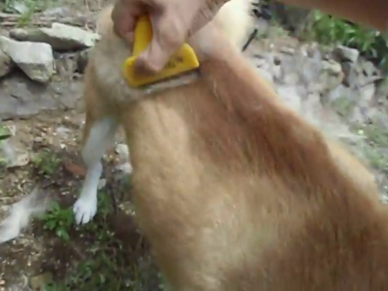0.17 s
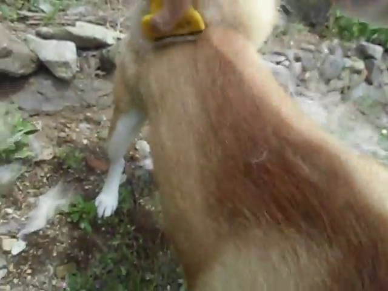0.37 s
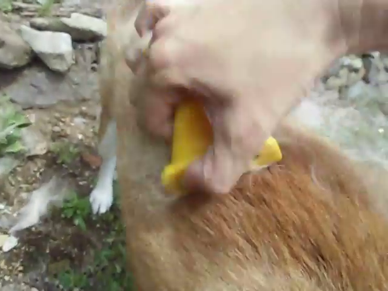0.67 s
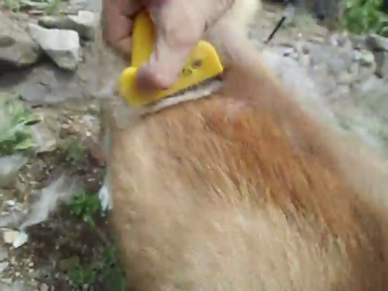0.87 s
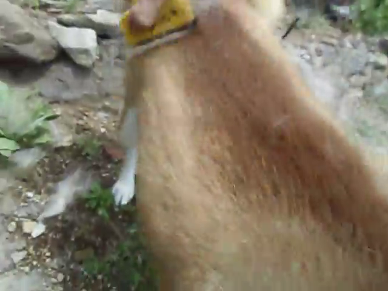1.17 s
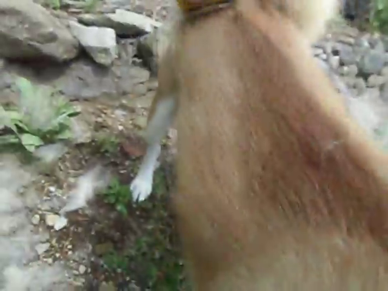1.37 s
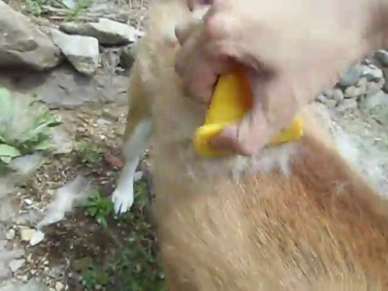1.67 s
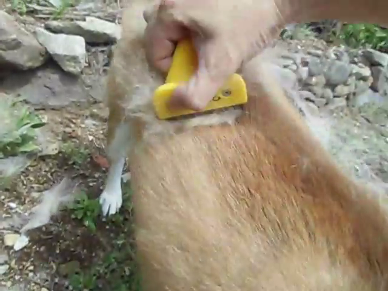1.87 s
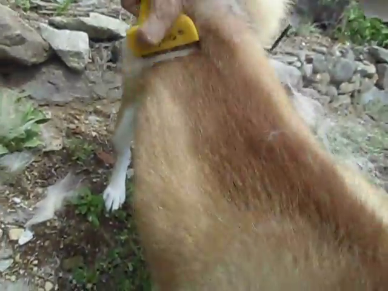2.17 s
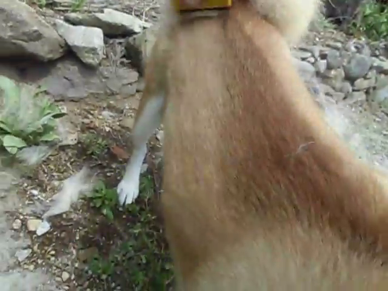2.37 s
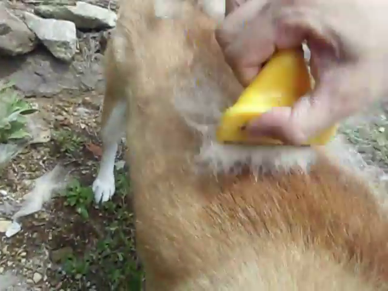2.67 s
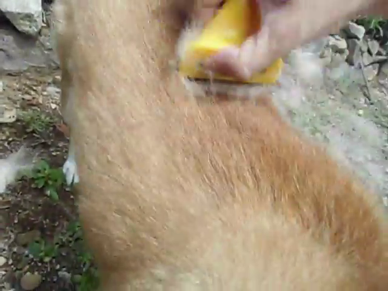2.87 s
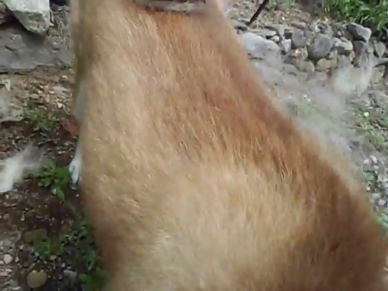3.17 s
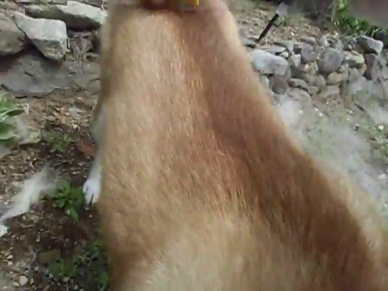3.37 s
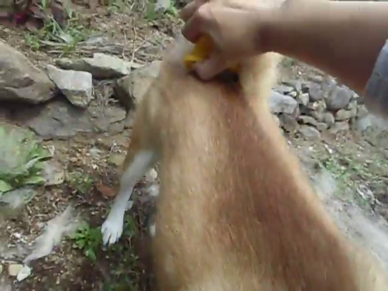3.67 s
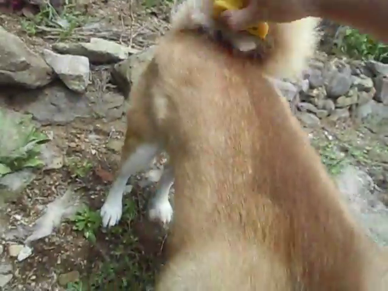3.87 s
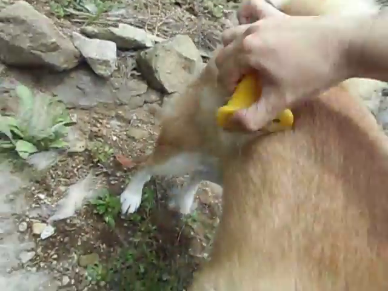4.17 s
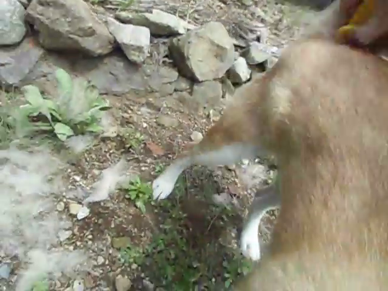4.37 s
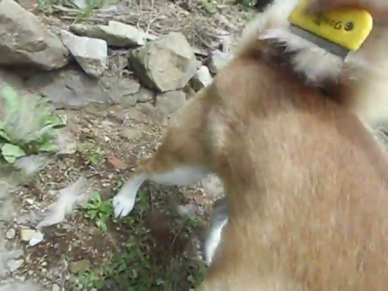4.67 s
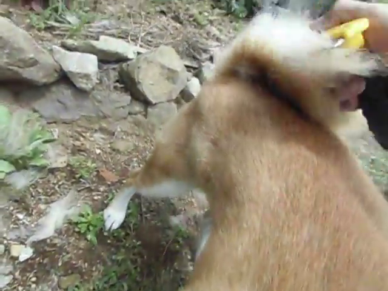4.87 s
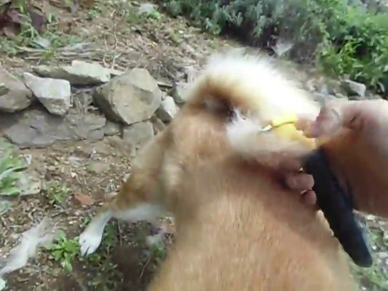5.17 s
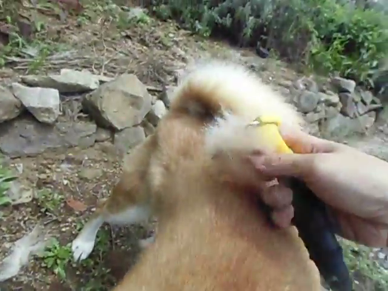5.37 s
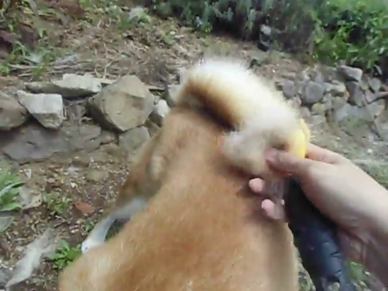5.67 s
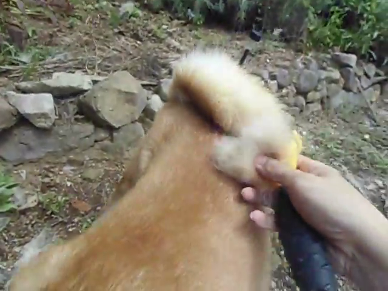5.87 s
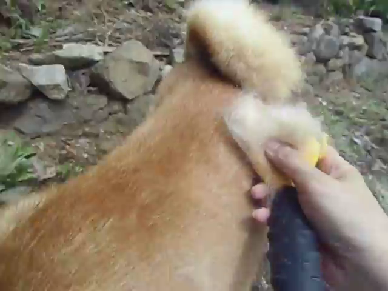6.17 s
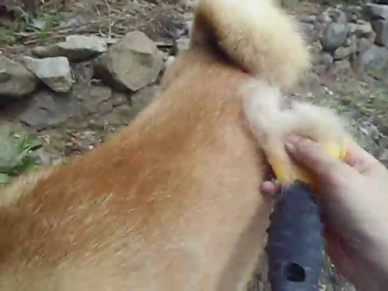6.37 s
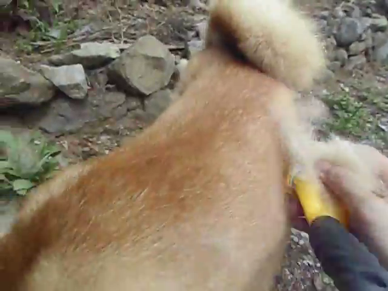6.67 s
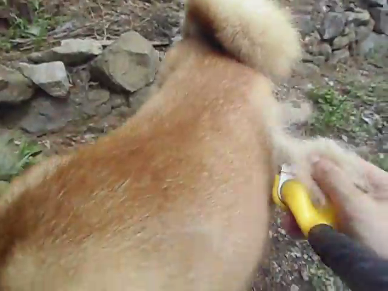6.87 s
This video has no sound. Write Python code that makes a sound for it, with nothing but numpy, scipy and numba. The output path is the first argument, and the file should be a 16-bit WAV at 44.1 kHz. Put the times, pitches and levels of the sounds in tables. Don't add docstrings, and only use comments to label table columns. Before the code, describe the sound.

Bright, rapidly throbbing cicada song outdoors, with low wind buffets, tiny motor ticks and soft scratchy snaps of a grooming brush in a coat.

```python
import sys
import numpy as np
from scipy import signal
from scipy.fft import rfft, irfft, next_fast_len
from scipy.io import wavfile
from scipy.ndimage import uniform_filter1d
from numba import njit

SR = 44100
rng = np.random.default_rng(int(sys.argv[2]) if len(sys.argv) > 2 else 0)


def output_pcm(signal):
    pcm = np.clip(np.atleast_2d(signal).T, -1, 1) * 32767
    wavfile.write(sys.argv[1], SR, np.round(pcm).astype(np.int16))


def gain_from_db(level_db):
    decades = np.asarray(level_db, float) / 20
    return 10 ** decades


N = 309582
TIME = np.arange(N) / SR

# time in seconds, strokes done (whole numbers = ring at its highest).
ABDOMEN_STROKES = [
    (0.0, 0.08),
    (0.75, 11.24),
    (1.5, 22.48),
    (3.5, 52.44),
    (5.25, 78.72),
    (6.25, 93.86),
    (7.03, 105.61),
]
# time in seconds, level in dB, low stroke over its usual share in dB,
# deep ring over the low drum in dB.
SONG = [(0.0, -44.5, -3, 6.5), (0.7, -42.5, -0.5, 4), (1.05, -42, -1, 4), (1.75, -43, -2.5, 2.5),
        (2.1, -42, -1, 4.5), (2.45, -46, 0.5, 3.5), (2.8, -44, -2, -1), (3.15, -44.5, -5, 6.5),
        (3.85, -43.5, -2, 0), (4.2, -41, -5, 0), (4.55, -42, -4.5, -7), (4.9, -41.5, -2.5, 1.5),
        (5.4, -40, -1.5, 5.5), (6.3, -47, -2.5, 2), (6.65, -43.5, 0, 1.5), (7.02, -45.5, -2, 4)]
# time in seconds, click pairs a second.
CLICK_PAIRS = [
    (0, 175.5),
    (2.7, 175.9),
    (4.5, 176.4),
    (7.02, 177.1),
]
# time in seconds, lag in ms, level in dB.
HAND_BOUNCE = [
    (0, 1.87, -15),
    (3, 1.29, -8),
    (5.3, 1.96, -13.5),
    (5.95, 1.73, -1),
    (6.3, 1.5, -1),
    (6.6, 1.4, -5),
    (7.02, 1.4, -5),
]
# centre in Hz, width in Hz, level in dB.
DEEP_RING = [(4680, 170, 1), (4540, 90, 0), (4840, 90, -3), (4175, 60, -10)]
# centre in Hz, width in Hz, level in dB.
HIGH_DRUM = [(7930, 650, 0), (7350, 500, -4)]
# centre in Hz, width in Hz, level in dB.
LOW_OVERTONE = [(10600, 400, 0), (11050, 550, -1)]
# centre in Hz, width in Hz, level in dB.
SHELL = [(9537, 140, 12.5), (9880, 130, 14.5), (9240, 2200, -12), (6100, 400, -30), (13900, 12000, -13)]
LOW_DRUM_DB, HIGH_DRUM_DB, LOW_OVERTONE_DB, STONES_LAG_MS = -10, -17.5, -13, 0.409
FALL_LEAD = .04

# frequency in Hz, level in dB per Hz.
GARDEN_COLOUR = [(40, -7.5), (150, -4.5), (400, -5.5), (820, -12.5), (1600, -19), (3300, -22.5),
                 (4380, -20), (4600, -12.5), (5700, -12), (6800, -18.5), (8700, -22), (10500, -13),
                 (12200, -13.5), (14300, -13.5), (16000, -19.5)]
GARDEN_DB = -46.5

# peak time in seconds, length in seconds, buffet in dB,
# flutter over buffet in dB.
GUSTS = [(0.036, 0.18, -37.5, -8), (1.827, 0.073, -38.5, -16), (1.933, 0.084, -35, -7),
         (2.079, 0.087, -36.5, -12), (2.205, 0.15, -41, -4), (2.415, 0.14, -45.5, 3),
         (2.636, 0.18, -40.5, 0.5), (2.724, .1, -36.5, -7), (2.855, 0.049, -34, -15),
         (3.275, 0.22, -44.5, -3), (3.673, 0.15, -47.5, -1), (3.93, 0.085, -41, -4), (4.064, 0.09, -34, -9),
         (4.16, .1, -33.5, -32), (4.308, 0.16, -32, -4), (4.443, 0.11, -26, -20),
         (4.585, 0.065, -33.5, -41), (4.683, 0.087, -33, -38), (4.797, 0.053, -37.5, 0),
         (4.9, 0.23, -41, -12), (5.183, 0.11, -33, -15), (5.307, 0.08, -34, 7), (5.396, 0.15, -29.5, -1),
         (5.566, 0.34, -42, -13), (5.933, .15, -45.5, -1), (6.126, .08, -35.5, -5),
         (6.32, 0.08, -35.5, -28), (6.455, 0.1, -27.5, -9), (6.665, 0.08, -42.5, -19),
         (6.85, 0.15, -44.5, -24)]
BREEZE_DB, FLUTTER_DB = -47, -42.5

# start in seconds, length in seconds, level in dB, brightest point in Hz, width in Hz.
STROKES = [(0.062, 0.13, -51.5, 4050, 2000), (0.242, 0.21, -64, 3500, 2000),
           (1.028, 0.15, -59.5, 3650, 2000), (1.862, 0.11, -69, 3220, 2000),
           (2.077, 0.092, -62, 3520, 2000), (2.924, 0.069, -54, 4230, 1100),
           (3.273, 0.059, -61, 3600, 1500), (3.773, .05, -60, 3500, 1500), (4.158, 0.067, -67, 3500, 2000),
           (4.302, .09, -59, 3800, 2000), (5.18, 0.65, -63, 3530, 1960), (5.85, 0.19, -69, 3500, 1980)]
# time in seconds, peak level in dB.
SNAPS = [(0.0413, -63), (0.0882, -47), (0.1284, -52), (0.2758, -51), (0.9797, -53), (1.0115, -44),
         (1.035, -42), (1.1318, -49), (2.9776, -51), (3.1082, -53), (3.3, -52), (3.6744, -57),
         (3.7954, -57), (3.8087, -51), (4.4643, -56)]

# first step in seconds, number of steps,
# level in dB, change a step in dB.
HUNTS = [(0.047, 1, -53, 0), (0.115, 3, -58, -1), (0.248, 5, -60.5, .5), (0.449, 5, -56.5, -0.5),
         (0.949, 5, -60, 1.15), (1.114, 5, -63.5, 0.5), (1.282, 2, -59.5, 3), (1.482, 1, -62, 0),
         (1.549, 5, -59.5, .7), (2.049, 3, -62.5, 2.5), (2.283, 4, -62.5, 1.9), (2.784, 1, -60, 0),
         (2.851, 2, -58.5, 1.5), (3.051, 5, -59.5, .8), (3.251, 5, -58.5, -0.4), (4.052, 5, -60, 0.7),
         (4.251, 5, -56, -0.6), (4.821, 5, -57, .1), (5.018, 5, -60.5, 1.55), (5.22, 4, -56, -0.6),
         (5.52, 5, -55.5, -0.7), (5.72, 4, -61.5, .1), (5.855, 5, -57.5, 0.1), (6.054, 5, -57.5, 0),
         (6.289, 4, -60, 0.4), (6.687, 3, -60, 1), (6.988, 1, -64, 0)]
# centre in Hz, width in Hz, level in dB.
CAMERA_BODY = [(1388, 550, -0.5), (1849, 190, 6), (1994, 177, 5.5), (2638, 270, 4)]
FRAME_S = 1 / 29.97
STEP_SCATTER_DB = .8

# time in seconds, pitch in Hz, level in dB.
CHIRP = [
    (6.468, 3800, -80),
    (6.476, 3850, -58),
    (6.5, 3870, -54),
    (6.508, 3800, -76),
    (6.518, 3600, -61),
    (6.535, 3380, -59),
    (6.543, 3300, -82),
]


def unit(x):
    return x / np.sqrt(np.mean(x ** 2))


def curves(table):
    s, *columns = np.transpose(table)
    return [np.interp(TIME, s, c) for c in columns]


@njit
def svf(x, hz, width):
    y, b, l = np.empty(len(x)), 0., 0.
    for i in range(len(x)):
        g = np.tan(np.pi * hz[i] / SR)
        k = np.pi * width[i] / SR * (1 + g * g) / g
        v = (b + g * (x[i] - l)) / (1 + g * (g + k))
        b, l, y[i] = 2 * v - b, l + 2 * g * v, k * v
    return y


def svf_twice(x, hz, width):
    return svf(svf(x, hz, width), hz, width)


def ring(x, hz, width_hz):
    b, a = signal.iirpeak(hz, hz / width_hz, SR)
    return signal.lfilter(b, a, signal.lfilter(b, a, x))


def body(x, modes):
    return unit(sum(gain_from_db(db) * ring(x, hz, width) for hz, width, db in modes))


def impulses(s, size):
    margin = 16
    out = np.zeros(N + 64)
    at = np.clip(s * SR, 0, N) + margin
    near = np.floor(at)[:, None] + np.arange(-7, 9)
    off = near - at[:, None]
    pulse = np.sinc(off) * np.cos(np.pi * off / 16) ** 2
    np.add.at(out, near.astype(int), size[:, None] * pulse)
    return out[margin:N + margin]


def walk(rate):
    k = int(SR / rate)
    held = rng.standard_normal(N // 100)[np.arange(N) // k]
    return unit(uniform_filter1d(uniform_filter1d(held, k), k))


def cicada():
    done = curves(ABDOMEN_STROKES)[0]
    turn = 2 * np.pi * (done + FALL_LEAD * (1 - np.cos(2 * np.pi * done)))
    stroke = np.cos(turn)
    up = .5 + .5 * np.tanh(.9 * stroke) / np.tanh(.9)
    down = (1 - up) ** 1.04

    over_high_db, share_db, deep_db = curves(SONG)
    low_db = over_high_db + share_db + LOW_DRUM_DB
    high_db = over_high_db + HIGH_DRUM_DB
    over_low_db = over_high_db + share_db + LOW_OVERTONE_DB

    pairs = np.cumsum(curves(CLICK_PAIRS)[0] * (1 - 0.001666 * stroke + .0008 * walk(12))) / SR
    k = np.arange(int(2 * pairs[-1]))
    chance = rng.standard_normal((N // 100, 2))[:len(k)].T
    right = k % 2
    s = np.interp(k / 2, pairs, TIME) + 9e-6 * chance[0]
    lame = right * (0.013 + np.interp(s, TIME, up) ** 2)
    size = gain_from_db(-4.5 * lame + 1.2 * chance[1] + .6 * np.interp(s, TIME, walk(14)))
    s = s + 30e-6 * lame

    hand_ms, hand_db = (np.interp(s, TIME, c) for c in curves(HAND_BOUNCE))
    stones_s = STONES_LAG_MS / 1000 * (1 + .04 * np.interp(s, TIME, walk(1.5)))
    s = np.r_[s, s + stones_s, s + hand_ms / 1000]
    size = np.r_[size, gain_from_db(-14) * size, gain_from_db(hand_db) * size]
    clicks = impulses(s, size)
    uneven = impulses(s, size * gain_from_db(-7 * np.tile(right, 3)))

    analytic = signal.hilbert(uneven, next_fast_len(N))[:N]
    swung = np.real(analytic * np.exp(2j * np.pi * .5 * pairs))
    drum_hz, drum_width_hz = 5330 - 200 * np.sin(turn), 700 + 0 * up
    low = gain_from_db(3) * (0.06 + down) * unit(svf_twice(swung, drum_hz, drum_width_hz))
    low = low + gain_from_db(-2) * down ** 1.5 * body(swung, [(5370, 200, 0), (5190, 150, 0)])
    deep = gain_from_db(deep_db) * (down * body(swung, DEEP_RING) + 0.5 * up * body(clicks, DEEP_RING[:2]))
    high = gain_from_db(high_db + 4.5) * up ** 4 * body(clicks, HIGH_DRUM)

    hz, width_hz = 10800 + 4550 * up ** 1.5, 850 + 2100 * up
    overtone = svf_twice(clicks, hz, width_hz) / np.sqrt(width_hz)
    over_db = over_low_db - 1.5 + (over_high_db + 6 - over_low_db) * up ** 0.8
    arch = unit(svf(svf(clicks, 0.519 * hz, 0.15 * width_hz), 0.518 * hz, 0.15 * width_hz))
    high = high + gain_from_db(high_db + 1.5) * up ** 0.73 * arch

    near = gain_from_db(low_db - 0.5) * (low + deep) + high + gain_from_db(-59.5) * body(clicks, SHELL)
    near += gain_from_db(over_db) * unit(overtone)
    near += gain_from_db(over_low_db + 5.0) * down ** 0.52 * body(clicks, LOW_OVERTONE)
    haze = rng.standard_normal(9000) * np.exp(-np.arange(9000) / SR / 0.007)
    haze = haze / np.sqrt(np.sum(haze ** 2))
    return near + gain_from_db(-12) * signal.fftconvolve(near, haze)[:N]


def garden():
    hz = np.maximum(np.arange(N // 2 + 1) * SR / N, 1)
    colour_hz, colour_db = np.transpose(GARDEN_COLOUR)
    colour = np.interp(np.log(hz), np.log(colour_hz), colour_db)
    hiss = unit(irfft(rfft(rng.standard_normal(N)) * gain_from_db(colour), N))
    cricket = unit(ring(rng.standard_normal(N), 2469, 66))
    return gain_from_db(GARDEN_DB + .5 * walk(1.71)) * hiss + gain_from_db(-74 + 0.76 * walk(2.9)) * cricket


def gusts():
    s, length, db, over_db = np.transpose(GUSTS)
    slow = TIME[::64]
    bells = np.exp(-(2.0 * (slow - s[:, None]) / length[:, None]) ** 2)
    push, shiver = (np.interp(TIME, slow, gain_from_db(d) @ bells) for d in (db, db + over_db))
    breeze = gain_from_db(BREEZE_DB + 0.5 * walk(12))
    return breeze + push, shiver + gain_from_db(FLUTTER_DB + 1.7 * walk(4.5)) / (1 + 1.8 * push / breeze)


def wind():
    push, shiver = gusts()
    chance = rng.random((1500, 2)).T
    kick_size = gain_from_db(-2.2 * np.log(1 - chance[1])) * (-1.) ** np.arange(1500)
    kicks = impulses(chance[0] * N / SR, kick_size)
    eddies = unit(kicks) + 0.64 * rng.standard_normal(N)
    buffet = push * body(eddies, [(34.7, 42.6, 7.5), (56, 47.5, -1.5)])
    flutter = shiver * gain_from_db(-7.0) * body(eddies, [(105.0, 103, 3.5), (174, 55, -11)])
    soft = signal.butter(4, 330, fs=SR, output="sos")
    return signal.sosfilt(soft, buffet + flutter)


def brush():
    chance = rng.random((3500, 2)).T
    tick_size = gain_from_db(-2.1 * np.log(1 - chance[1])) * (-1.) ** np.arange(3500)
    ticks = unit(impulses(chance[0] * N / SR, tick_size))
    hairs = (ticks + 0.4 * rng.standard_normal(N)) * gain_from_db(4.4 * walk(45))
    out = np.zeros(N)
    for start, length, db, hz, width in STROKES:
        at = slice(int(start * SR), int((start + length) * SR))
        rasp = body(hairs[at], [(hz, width, 0), (1500, 1500, -6), (6500, 3500, -7)])
        out[at] += gain_from_db(db) * np.hanning(len(rasp)) ** 0.14 * rasp
    s, db = np.transpose(SNAPS)
    snaps = impulses(s, gain_from_db(db + 26))
    return out + ring(snaps, 3850, 1800) + 0.75 * ring(snaps, 5200, 5000)


def motor_steps():
    rows = []
    for s, count, db, change in HUNTS:
        for k in range(int(round(count))):
            rows.append((s + k * FRAME_S, db + k * change))
    s, db = np.transpose(rows)
    return s, db + STEP_SCATTER_DB * rng.standard_normal(200)[:len(s)]


def focus_motor():
    s, db = motor_steps()
    after = np.arange(1800) / SR
    rattle = np.exp(-(after / 0.02) ** 1.7) * np.minimum(after / 0.0015, 1)
    shake = signal.fftconvolve(impulses(s, gain_from_db(db)), rattle)[:N] * rng.standard_normal(N)
    chance = rng.standard_normal((200, 6))[:len(s)]
    knock = np.arange(3)
    when = s[:, None] + 0.001993 + 0.0062 * knock + 0.000828 * chance[:, :3]
    knock_db = db[:, None] + 22.5 - 5.9 * knock + 1.2 * chance[:, 3:]
    knocks = impulses(when.ravel(), gain_from_db(knock_db).ravel())
    drive = shake + knocks
    through_body = gain_from_db(4.0) * body(drive, CAMERA_BODY) * np.sqrt(np.mean(drive ** 2))
    return through_body + ring(knocks, 1340, 670)


def bird():
    hz, db = curves(CHIRP)
    turn = 2 * np.pi * np.cumsum(hz) / SR
    return gain_from_db(db + 1.2 * walk(98)) * (db > -80) * (np.sin(turn) + 0.91 * np.sin(2 * turn))


def scene():
    mono = cicada() + garden() + wind() + brush() + focus_motor() + bird()
    return np.tile(mono, (2, 1))


def roll_off(x):
    return signal.sosfilt(signal.butter(12, 16680, fs=SR, output="sos"), x)


def record(dry):
    top = signal.ellip(14, .5, 75, 15790, fs=SR, output="sos")
    mix = signal.sosfilt(top, dry)
    return roll_off(mix)


dry = scene()
out = record(dry)
output_pcm(out)
```